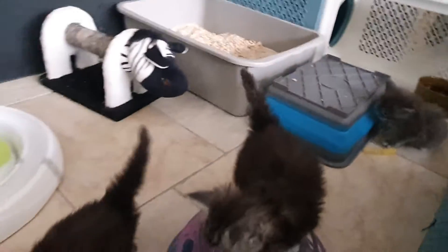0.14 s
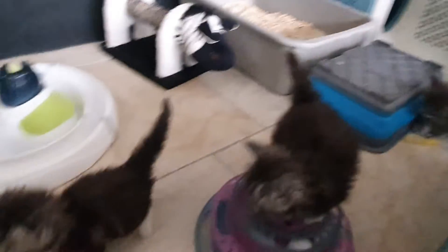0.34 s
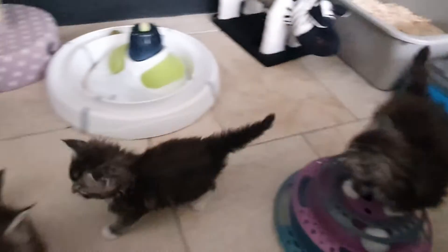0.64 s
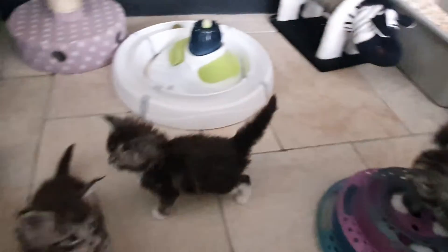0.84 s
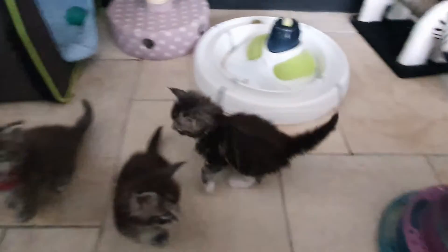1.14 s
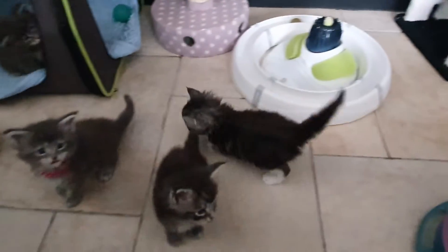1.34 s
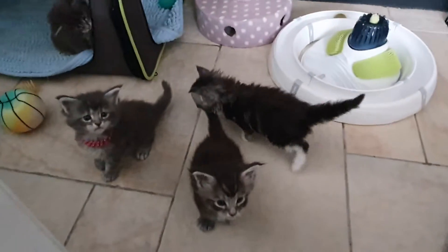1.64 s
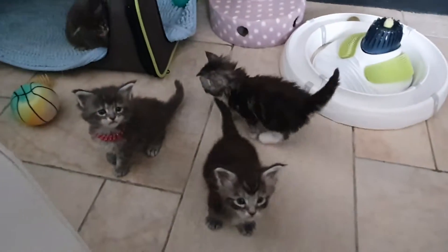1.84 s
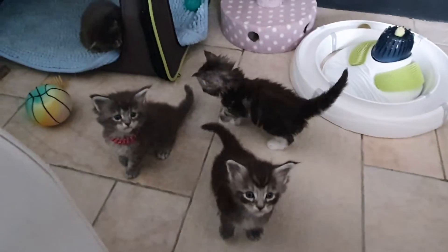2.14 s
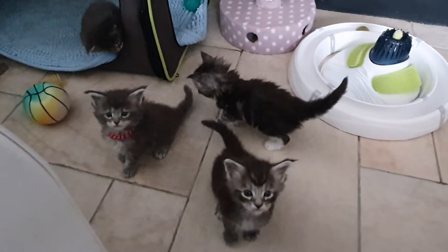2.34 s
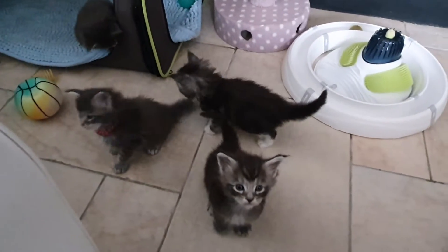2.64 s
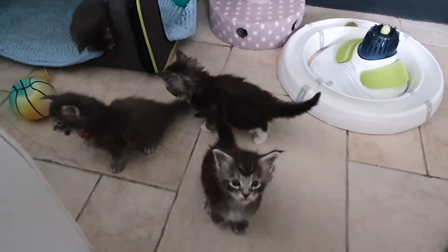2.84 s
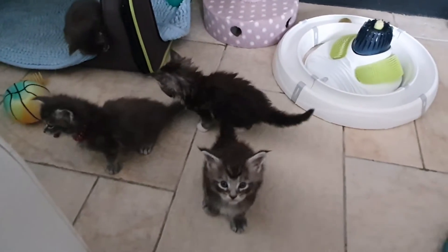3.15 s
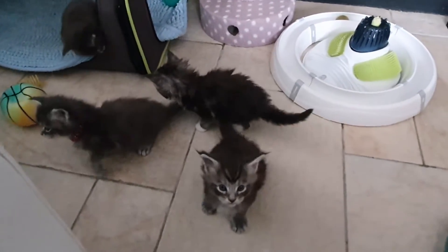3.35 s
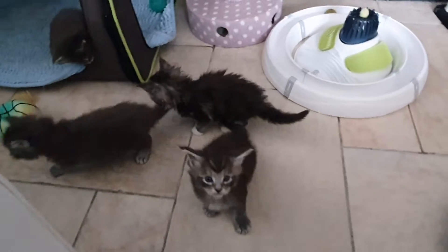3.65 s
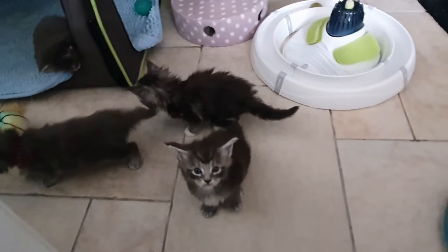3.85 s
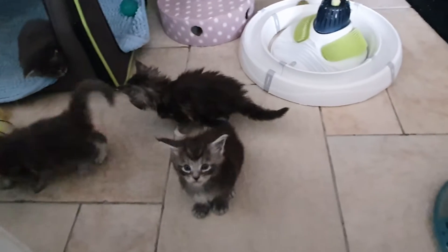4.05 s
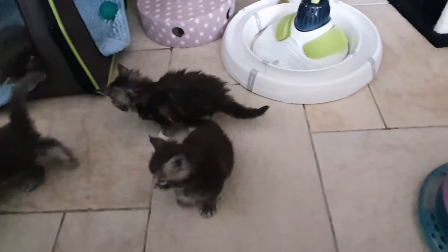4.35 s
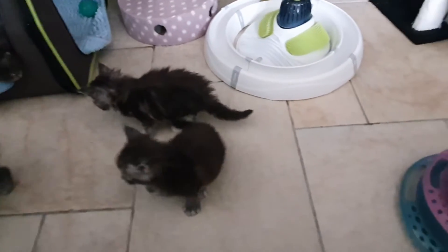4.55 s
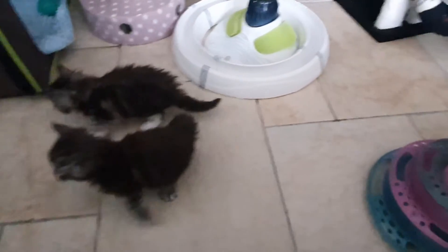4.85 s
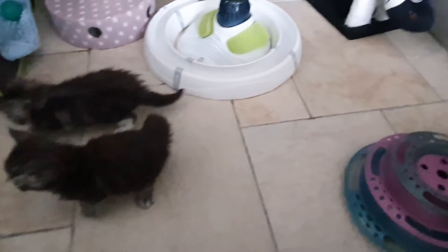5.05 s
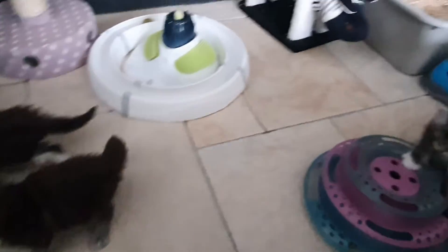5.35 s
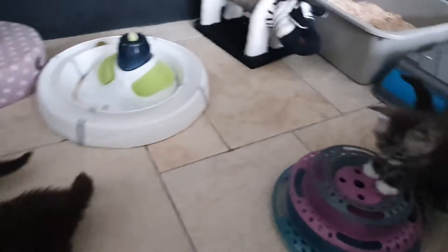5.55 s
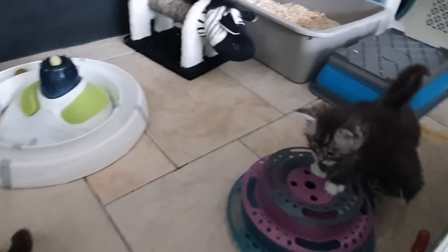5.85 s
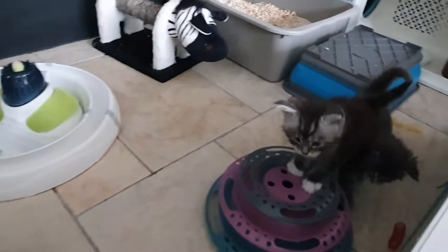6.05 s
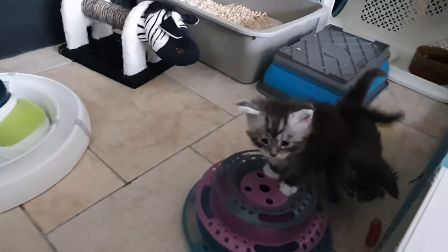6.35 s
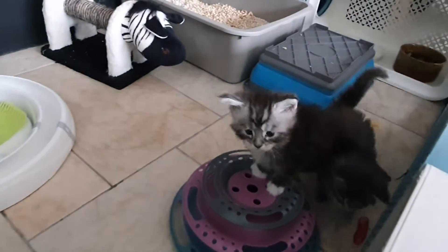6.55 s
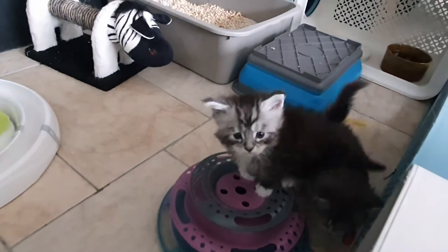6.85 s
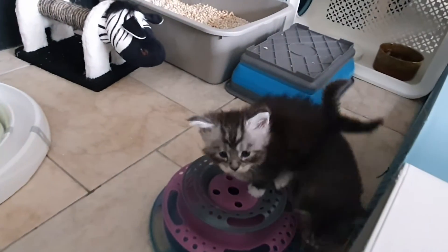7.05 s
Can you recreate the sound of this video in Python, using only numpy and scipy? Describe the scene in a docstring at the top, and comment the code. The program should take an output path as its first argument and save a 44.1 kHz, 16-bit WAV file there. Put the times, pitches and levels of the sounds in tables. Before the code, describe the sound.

In a small, lively tiled room with faint low rumble and hiss, a kitten gives a bright falling mew, with soft rustling and paw thuds. A second, softer mew follows, running into a burst of hollow plastic knocks and sharp ball clicks. More knocks come, then a tiny hoarse peep and two faint overlapping mews. Sparse knocks and one dry tap end it. Close handheld stereo microphone.

```python
"""A low rumble, faint hum and hiss come first, with a weak shell hum from a rocked toy; then kittens mew.
Cries are partials on a trembling pitch, shaped by the opening mouth, in a small, live, tiled room.
A hollow plastic track toy knocks on the tiles: a boom of damped modes plus a noisy clack of its walls.
Balls and claws click as short noise cracks; paws thud, something rustles early on, one dry tap comes late."""
import sys
import numpy as np
from scipy import signal
from scipy.fft import rfft, irfft, next_fast_len
from scipy.io import wavfile
from scipy.ndimage import map_coordinates

SR = 44100
rng = np.random.default_rng(int(sys.argv[2]) if len(sys.argv) > 2 else 0)


def int16_out(signal):
    """Quantize to a 16-bit WAV file."""
    q = np.round(np.clip(np.atleast_2d(signal).T, -1, 1) * 32767)
    wavfile.write(sys.argv[1], SR, q.astype(np.int16))


N = 317512

# Cries: t/s, f/Hz (pitch), level/dB (effort, relative), mouth opening (0-1)
LONG_MEW = [(.811, 1293, -68.5, 1), (.83, 1215, -63, 0.85), (.85, 1253, -56.5, 1), (.905, 1248, -60, 0.84),
            (.945, 1268, -49.5, 0.83), (.975, 1272, -53, 0.58), (1.035, 1231, -55, .33),
            (1.095, 1227, -55, 0.4), (1.125, 1190, -62, 0.68), (1.18, 1150, -60, 0.21),
            (1.23, 1171, -61.5, 0.46), (1.33, 1116, -61.5, 0.29), (1.41, 1084, -67.5, 0),
            (1.455, 1140, -78, 0.05), (1.485, 875, -73.5, 0.01)]
SECOND_MEW = [(2.948, 1173, -75.5, 0.75), (2.995, 1222, -60, 0.55), (3.025, 1202, -59, 0.79),
              (3.08, 1194, -58.5, 0.74), (3.12, 1171, -65, 0.71), (3.23, 1133, -64.5, 0.53),
              (3.31, 1111, -64, 0.47), (3.345, 1163, -67, .2), (3.385, 1244, -70, 0.147),
              (3.44, 1186, -71.5, 0.045)]
PEEP = [(4.478, 1052, -89.5, 0.0086), (4.505, 1076, -99.5, 0)]
RISING_MEW = [(4.615, 1005, -84.5, 0.73), (4.655, 996, -69, 0.78), (4.73, 1069, -67.5, 1),
              (4.765, 1153, -66, 0.97), (4.8, 1199, -69, 0.51), (4.9, 1219, -71.5, 0.63),
              (4.975, 1296, -79.5, .2), (5.01, 1282, -73.5, 0.051), (5.065, 1221, -77, 0.092)]
ANSWER_MEW = [(4.985, 1445, -79, 0.25), (5.01, 1446, -73.5, 0.26), (5.05, 1425, -70, .3),
              (5.09, 1353, -75, 0.11), (5.14, 1311, -83, 0.18)]
# Lean of cries between microphones: f/Hz, left minus right level/dB
LEAN_LONG = [(1200, -1), (2450, 2), (3700, -4), (5500, 1), (11000, -0.5)]
LEAN_SECOND = [(1200, -10), (2400, -5.5), (3600, 1), (5500, -5), (11000, -3.5)]
LEAN_FAR = [(1200, -1.5), (11000, -1.5)]


def kittens():
    """Two near cries, then a hoarse peep and a farther, rougher cry that a second kitten joins."""
    long = mew(LONG_MEW, LEAN_LONG, first_db=6.0, bright_db=3.0, wet_db=-6, lag_ms=-0.378,
               jitter=0.002276, catch=23, rasp_db=-41, air_db=-17)
    second = mew(SECOND_MEW, LEAN_SECOND, first_db=-0.5, bright_db=0.0, wet_db=-4, lag_ms=.03,
                 jitter=0.0036, catch=7.2, rasp_db=-44.0, air_db=-9.5)
    peep = mew(PEEP, LEAN_FAR, first_db=4.5, bright_db=-11.5, wet_db=2.5, lag_ms=-.44,
               jitter=0.021, catch=6.7, rasp_db=-1, air_db=-8.5)
    rising = mew(RISING_MEW, LEAN_FAR, first_db=5.0, bright_db=-7, wet_db=-1.5, lag_ms=-.45,
                 jitter=.006, catch=.3, rasp_db=-35, air_db=1)
    answer = mew(ANSWER_MEW, LEAN_FAR, first_db=15, bright_db=-7, wet_db=-8, lag_ms=-0.37,
                 jitter=0.0096, catch=3.4, rasp_db=-26.5, air_db=-19)
    return long + second + peep + rising + answer


# Throat response beside the main mouth resonance: f/Hz, level/dB
THROAT = [(1200, 0.5), (2400, 3), (3300, -6), (3750, -1), (4200, -6), (5000, -1.5), (5500, -2), (6200, 3.5),
          (6800, 2), (7500, -15), (8100, -11), (8500, -1.5), (10000, -13), (11300, -2), (12300, 0),
          (13700, -13.5), (15500, -21)]
# Spectrum of the breath noise in a cry: f/Hz, level/dB (per Hz, relative)
AIRY = [(600, -23.5), (1300, -0.5), (2000, -20), (2900, -11.5), (3800, -1), (4600, -2), (6400, 2.5),
        (7800, -17), (10000, -7), (11500, -6.5), (12800, -4.5), (14000, -12), (15500, -18)]
# Main mouth resonance, shut to open
SHUT_HZ, OPEN_HZ, MOUTH_WIDTH_HZ = 2245, 3772, 525
SHUT_DB, OPEN_DB = 16, 25.5
NASAL_DB = 9  # loss of the first partial at full opening


def mew(rows, lean, first_db, bright_db, wet_db, lag_ms, jitter, catch, rasp_db, air_db):
    """One cry: partials on a trembling pitch; the mouth resonance rises and strengthens as it opens."""
    s, *columns = np.transpose(rows)
    t = np.arange(s[0], s[-1], 1 / SR)
    pitch_hz, effort_db, opening = [np.interp(t, s, c) for c in columns]
    order = np.arange(1, 15)[:, None]
    hz = order * pitch_hz

    centre_hz = SHUT_HZ + opening * (OPEN_HZ - SHUT_HZ)
    peak_db = SHUT_DB + opening * (OPEN_DB - SHUT_DB)
    mouth_db = peak_db / (1 + ((hz - centre_hz) / MOUTH_WIDTH_HZ) ** 2)
    # facing the microphones: bright_db per octave above 5 kHz
    facing_db = bright_db * np.log2(np.maximum(hz / 5000, 1))
    nasal_db = (first_db - NASAL_DB * opening) * (order == 1)
    flutter_db = np.array([wobble(60, len(t)) for _ in order])
    gains = amp(effort_db + along(THROAT, hz) + mouth_db + facing_db + nasal_db + flutter_db)

    # folds catch roughly at onset, then settle to a slight tremble
    unrest = 1 + abs(catch) * np.exp(-(t - t[0]) / .005)
    tremble = wobble(200, len(t)) + wobble(900, len(t))
    pitch_hz = pitch_hz * (1 + jitter * np.sqrt(unrest) * tremble)
    phase = 2 * np.pi * np.cumsum(pitch_hz) / SR
    voice = np.sqrt(2) * np.sum(gains * np.sin(order * phase), axis=0)

    # turbulence: noisy skirt round each partial, plus hiss through the mouth
    voice = voice * (1 + amp(rasp_db) * wobble(1500, len(t)))
    voice = voice + amp(effort_db + air_db) * unrest ** 1.81 * noise(AIRY, len(t))[0]
    fade_in = np.clip((t - t[0]) / 0.0025, 0, 1)
    fade_out = np.clip((t[-1] - t) / 0.0084, 0, 1)
    voice = voice * fade_in * fade_out

    heard = amp(wet_db) * reverb(voice)
    add(heard, 0, placed(voice, lag_ms, pan_db=-1.5))
    out = np.zeros((2, N))
    add(out, s[0], filtered(heard, lambda hz: amp(along(lean, hz) * [[.5], [-.5]])))
    return out


# Knocks on the tiles: t/s, level/dB (relative), f/Hz (shell), clack level/dB (relative to shell)
KNOCKS = [(3.284, -25, 505, -9.5), (3.346, -28, 530, -20), (3.355, -29.5, 493, -11.5),
          (3.367, -21, 566, -17), (3.413, -37, 578, -2), (3.434, -31, 538, -22), (3.470, -38, 502, -7),
          (3.515, -38, 574, -29), (3.575, -25.5, 518, -6), (3.587, -30, 631, -18.5),
          (3.618, -35, 540, -3.5), (3.672, -35.5, 588, -5), (3.757, -43, 570, -21.5),
          (3.895, -19.5, 555, -17.5), (3.913, -27.5, 559, -5), (4.137, -38.5, 560, -14.5),
          (4.489, -52.5, 536, -19), (5.481, -57, 563, -26), (5.635, -36.5, 539, -11.5),
          (5.645, -31, 538, -14), (5.677, -36.5, 545, -19.5), (6.319, -34.5, 492, -15),
          (6.375, -29.5, 557, -9.5), (6.385, -29.5, 535, -13.5), (6.413, -37, 542, -3),
          (6.42, -35, 496, -19.5)]
# Shell modes beside the main boom: f/Hz, level/dB (relative), t60/s
BODY_MODES = [(228.6, -29.5, 0.1), (732, -20.5, 0.067), (1874, -33, 0.0087), (2165, -32, 0.22)]
# Spectrum of the thin walls' clack: f/Hz, level/dB (per Hz, relative)
CLACK = [(100, -25), (170, 0.5), (330, 5.5), (520, 14), (780, 8), (1050, 0.5), (1500, 0.5), (2300, 3),
         (3100, -10), (4300, -15), (6200, -47), (7800, -57), (12000, -50.5), (15500, -39.5)]
# Wobbling under a paw: start t/s, end t/s, first level/dB, last level/dB
ROCKING = [(0, .1, -62.5, -66), (3.1, 3.28, -48.5, -47), (3.86, 3.89, -45, -44), (3.98, 4.08, -50, -60)]
ROCK_GAP_S = .028  # mean gap between nudges
SHELL_HZ, SHELL_SCATTER = 550.4, 0.056  # nudge hum; scatter as a share of pitch
CONTACT_S = 0.00024  # rise time constant of a blow
CLACK_T60_S, SNAP_T60_S, SNAP_DB = 0.09, 0.0067, 5.5  # wall chatter; first snap, relative to it


def toy(moved_s=5, first_lag_ms=0.17, later_lag_ms=-0.14):
    """Each knock is a boom of the hollow shell, a snap and a chatter of its walls; nudges only hum."""
    out, t = np.zeros((2, N)), np.arange(SR // 8) / SR
    for s, db, hz, clack_db in KNOCKS:
        boom = amp(db - 3) * shell(t, hz, attack_s=0.0056, t60_s=0.03)
        for mode_hz, mode_db, t60_s in BODY_MODES:
            gain = amp(db + mode_db + rng.normal(0, 2))
            struck_hz = mode_hz * (1 + .02 * rng.standard_normal())
            boom = boom + gain * shell(t, struck_hz, attack_s=.001, t60_s=t60_s)
        chatter = unit(amp(4 * wobble(450, len(t)))) * amp(-60 * t / CLACK_T60_S)
        snap = amp(SNAP_DB - 60 * t / SNAP_T60_S)
        envelope = (1 - np.exp(-t / CONTACT_S)) ** 2 * (chatter + snap)
        clack = amp(db + clack_db - 7) * noise(CLACK, len(t)) * envelope
        # booms lean right in the first bout, left after moved_s
        lag_ms = first_lag_ms if s < moved_s else later_lag_ms
        add(out, s, placed(boom, lag_ms, pan_db=-lag_ms * 10) + clack)
        add(out, s, reverb(amp(-12.5) * boom + amp(-2.0) * clack[0]))

    for s, db in flurry(ROCKING, ROCK_GAP_S):
        hum_hz = SHELL_HZ * (1 + SHELL_SCATTER * rng.uniform(-1.4, 1))
        hum = amp(db) * shell(t, hum_hz, attack_s=0.00668, t60_s=0.029)
        add(out, s, placed(hum, first_lag_ms, pan_db=-5.5))
        add(out, s, amp(-3) * reverb(hum))
    return out


def shell(t, hz, attack_s, t60_s):
    """One damped mode of the hollow body: a sine with a soft attack and exponential decay."""
    envelope = (1 - np.exp(-t / attack_s)) * amp(-60 * t / t60_s)
    return envelope / envelope.max() * np.sin(2 * np.pi * hz * t)


# Hard clicks of balls and claws: t/s, level/dB (relative), brightness (dB per octave)
CLICKS = [(.382, -50.5, 2), (.741, -46.5, 4.5), (2.293, -60, 2), (2.879, -63, 10.5), (2.885, -49.5, -8),
          (3.345, -24.5, -2.5), (3.365, -36, -19.5), (3.428, -43.5, 6), (3.530, -26.5, -2.5),
          (3.581, -43, -13), (3.654, -35, 4.5), (3.660, -35.5, -4), (3.915, -39, 0.5), (4.161, -47.5, 5),
          (4.246, -55.5, 3.5), (5.062, -46.5, 5.5), (5.686, -43, -7.5), (6.376, -45, -7.5),
          (6.414, -41, -12.5)]
# Click spectrum: f/Hz, level/dB (per Hz, relative)
CLICK_COLOUR = [(400, -13), (1200, -4.5), (2400, 7), (3400, 0.5), (4800, 1.5), (6400, 0.5), (7800, -6),
                (10000, -9.5), (12000, -4.5), (15500, -28)]
# Balls rolling on in their track: start t/s, end t/s, first level/dB, last level/dB
ROLLING = [(3.38, 3.5, -44, -51.5), (3.56, 3.8, -52, -64), (4.17, 4.3, -61, -63), (5.5, 5.62, -71, -70)]
TICK_GAP_S, TICK_BRIGHT_DB = 0.032, 3.5  # mean gap; dB per octave


def clicks(crack_t60_s=.014, scatter_t60_s=0.078, scatter_db=-8, wet_db=-2.0):
    """Balls and claws strike hard surfaces: a short crack, scatter off near things, then the room."""
    out, t = np.zeros((2, N)), np.arange(SR // 12) / SR
    decay = amp(-60 * t / crack_t60_s) + amp(scatter_db - 60 * t / scatter_t60_s)
    envelope = (1 - np.exp(-t / .0012)) * decay
    ticks = [(s, db, TICK_BRIGHT_DB) for s, db in flurry(ROLLING, TICK_GAP_S)]
    for s, db, bright_db in list(CLICKS) + ticks:
        colour = [(hz, level + bright_db * np.log2(hz / 5000)) for hz, level in CLICK_COLOUR]
        crack = amp(db - 8.5) * noise(colour, len(t)) * envelope
        add(out, s, crack * amp([[-3], [1]]))
        add(out, s, amp(wet_db) * reverb(crack[0]) * amp([[-1.5], [1.5]]))
    return out


# Thuds of paws and of the handling: t/s, level/dB (relative)
THUDS = [(0.776, -58), (0.86, -64), (1.245, -49), (1.329, -52), (1.569, -56), (1.651, -60.5),
         (2.704, -57.5), (6.705, -57.5)]
# Thud spectrum: f/Hz, level/dB (per Hz, relative)
THUD_COLOUR = [(30, -4), (80, 5.5), (160, -13), (320, -7.5), (600, -25.5), (1500, -35.5), (5000, -52)]


def handling(tap_s=5.9268):
    """Thuds as decaying dull noise, and one dry tap, a damped cosine, at the right microphone."""
    out, t = np.zeros((2, N)), np.arange(SR // 6) / SR
    envelope = (1 - np.exp(-t / 0.001)) * amp(-60 * t / 0.18)
    for s, db in THUDS:
        add(out, s, amp(db) * noise(THUD_COLOUR, len(t)) * envelope)
    tap = amp(-31) * np.cos(2 * np.pi * 1100 * t) * np.exp(-t / .00035)
    tap = signal.lfilter(*signal.butter(3, 4200, fs=SR), tap)
    add(out, tap_s, tap * amp([[-28], [0]]))
    return out


# Spectra: f/Hz, level/dB (per Hz, relative)
RUMBLE = [(19, -39), (32, -5), (54, 4.5), (86, 2), (109, 3.5), (116, -9), (129, -11.5), (150, -14.5),
          (170, -22), (220, -50), (370, -120)]
LOW_AIR = [(90, -21.5), (150, 1), (330, 1.5), (450, -10.5), (700, -19), (1500, -32.5)]
HISS = [(260, -39.5), (450, -6.5), (530, -2.5), (745, -11.5), (1760, -14), (2330, -14.5), (3330, -16),
        (5680, -21), (6390, -22.5), (8350, -26.5), (15600, -22)]
RUSTLE_COLOUR = [(800, -5), (2500, -4), (4000, -7), (5200, -7.5), (6600, -1.5), (8500, -13), (9500, -19),
                 (15000, -13.5)]
# Level curves: t/s, level/dB (relative)
RUMBLE_LEVEL = [(0.0, -62.5), (0.2, -70), (1.08, -58.5), (2.06, -76.5), (2.3, -74), (3.01, -72.5),
                (3.27, -64.5), (3.51, -68), (4.31, -69.5), (4.89, -63.5), (5.33, -66), (5.59, -61),
                (5.88, -64.5), (7.2, -72)]
RUSTLE_LEVEL = [(0, -81), (.5, -80), (1.3, -64.5), (2.2, -104)]
RUMBLE_DB, LOW_AIR_DB = 2.5, -75  # gain on the level curve; mean level
AIR_FOLLOWS = 0.604  # share of the rumble's dB swings


def background():
    """Uneven rumble with low air that follows it, a faint mains hum, hiss, and a rustle that dies away."""
    t = np.arange(N) / SR
    rumble_db = np.interp(t, *np.transpose(RUMBLE_LEVEL))
    rumble_gain = amp(rumble_db + RUMBLE_DB + 1.416 * wobble(6.5, N))
    rumble = rumble_gain * noise(RUMBLE, merge_hz=70) * amp([[-3.2], [2.6]])
    swing_db = AIR_FOLLOWS * (rumble_db - rumble_db.mean())
    air = amp(LOW_AIR_DB + swing_db + 3.6 * wobble(7, N)) * noise(LOW_AIR)
    hum = amp(-70 + 2.8 * wobble(3, N)) * np.sin(2 * np.pi * 100 * t)
    rustle_db = np.interp(t, *np.transpose(RUSTLE_LEVEL)) + 3.6 * wobble(14, N)
    rustle = amp(rustle_db) * noise(RUSTLE_COLOUR)
    return rumble + air + hum + rustle + amp(-80.5) * noise(HISS)


# Room decay: f/Hz, t60/s
ROOM = [(100, 0.53), (300, 0.42), (550, 0.7), (1200, 0.37), (2400, 0.47), (6000, 0.48), (12000, 0.28),
        (16000, 0.037)]


def reverb(x, build_s=0.0014, merge_hz=650):
    """The room's answer: a fresh diffuse tail, wide in the treble, each band dying at its own speed."""
    hz, t, z = signal.stft(rng.standard_normal((2, SR * 3 // 4)), SR, nperseg=256)
    turn = np.pi / 4 * hz ** 2 / (hz ** 2 + merge_hz ** 2)
    width = np.array([np.cos(turn), np.sin(turn)])[:, :, None]
    z = z * width * amp(-60 * t / along(ROOM, hz)[:, None])
    mid, side = signal.istft(z * (1 - np.exp(-t / build_s)), SR, nperseg=256)[1]
    tail = np.array([mid + side, mid - side])
    return signal.fftconvolve(x[None], tail / np.linalg.norm(tail[0]), axes=1)


def placed(x, lag_ms, pan_db):
    """A sound reaches the two microphones at slightly different times and levels."""
    sides = np.array([[1], [-1]])
    delay = lambda hz: np.exp(-1j * np.pi * hz * sides * lag_ms / 1000)
    return amp(sides * pan_db / 2) * filtered(x, delay)


def flurry(spans, gap_s):
    """Uneven runs of small contacts, as (t/s, level/dB), each gliding from first level to last."""
    events = []
    for start, end, first_db, last_db in spans:
        chance = rng.standard_normal((16, 2))
        times = start + gap_s * np.abs(np.arange(16) + .25 * chance[:, 0])
        levels = np.interp(times, [start, end], [first_db, last_db]) + 2 * chance[:, 1]
        events += [(s, db) for s, db in zip(times, levels) if s < end]
    return events


def noise(colour, size=N, merge_hz=900):
    """Coloured stereo noise of rms 1, more alike at both microphones towards the bass."""
    turn = lambda hz: np.pi / 4 * (0.34 + 0.77 * hz / (hz + merge_hz))
    shape = lambda hz: amp(along(colour, hz)) * [np.cos(turn(hz)), np.sin(turn(hz))]
    mid, side = filtered(rng.standard_normal((2, size)), shape)
    return unit(np.array([mid + side, mid - side]))


def wobble(rate_hz, size):
    """A smooth random curve, rate_hz knots a second."""
    knots = rng.standard_normal(size // 8 + 8)
    return map_coordinates(knots, [np.arange(size) * rate_hz / SR + 2], mode="wrap")


def filtered(x, response):
    """Filter x by a response given as a function of f/Hz."""
    size = x.shape[-1]
    m = next_fast_len(size + 4096)
    return irfft(rfft(x, m) * response(np.fft.rfftfreq(m, 1 / SR)), m)[..., :size]


def along(points, hz):
    """Read (f/Hz, value) points on a log axis."""
    f, v = np.transpose(points)
    return np.interp(np.log(hz + 1), np.log(f + 1), v)


def amp(db):
    """Decibels to gain."""
    return 10 ** (np.asarray(db) / 20)


def unit(x):
    """Scale to rms 1."""
    return x / np.sqrt(np.mean(x ** 2) + 1e-20)


def add(track, s, sound):
    """Mix a sound into the track at time s."""
    start = max(round(s * SR), 0)
    track[:, start:start + sound.shape[-1]] += sound[..., :max(N - start, 0)]


def scene():
    """Everything that sounds in the room."""
    return kittens() + toy() + clicks() + handling() + background()


TOP_HZ, BOTTOM_HZ = 15720, 33.  # band limits


def record(dry):
    """Roll off the deepest rumble and cut everything above the band limit."""
    low_cut = lambda hz: hz ** 4 / np.sqrt(hz ** 8 + BOTTOM_HZ ** 8)
    return filtered(dry, lambda hz: (hz < TOP_HZ) * low_cut(hz))


dry = scene()
out = record(dry)
int16_out(out)
```